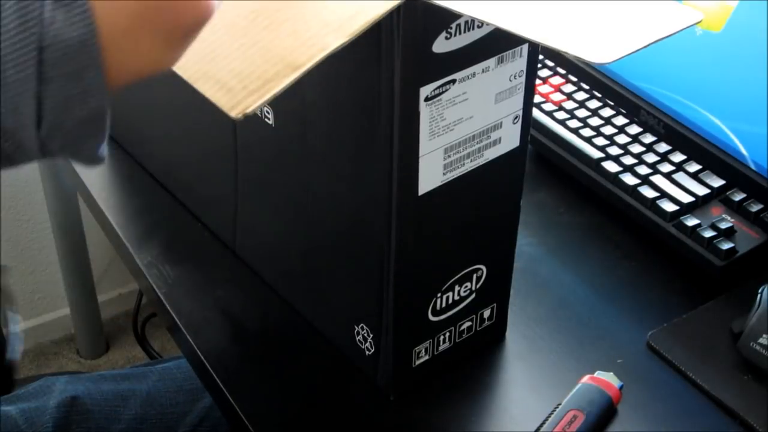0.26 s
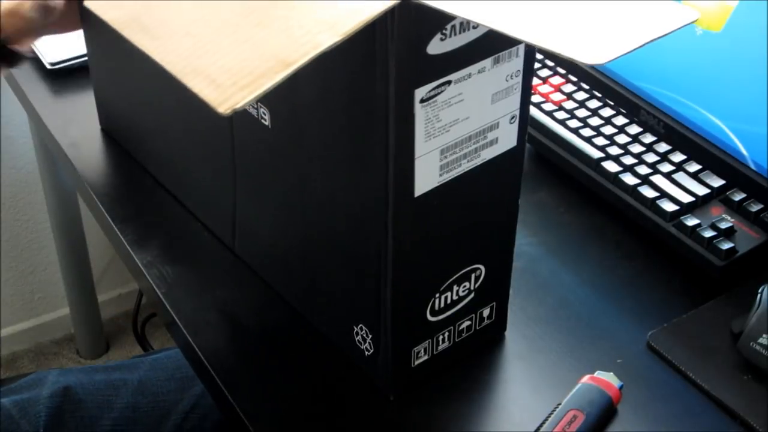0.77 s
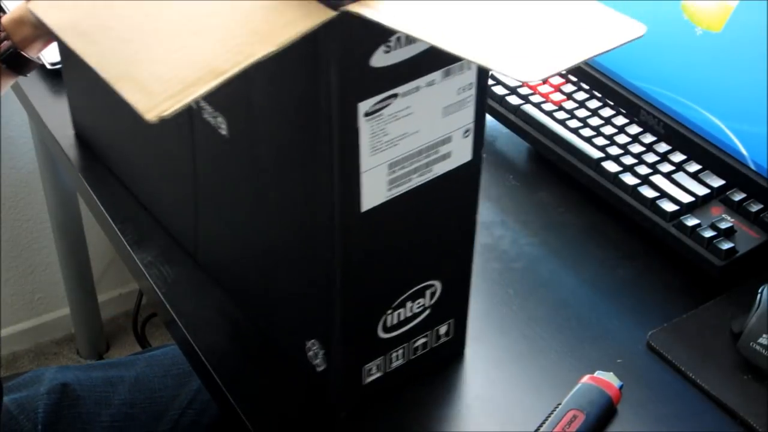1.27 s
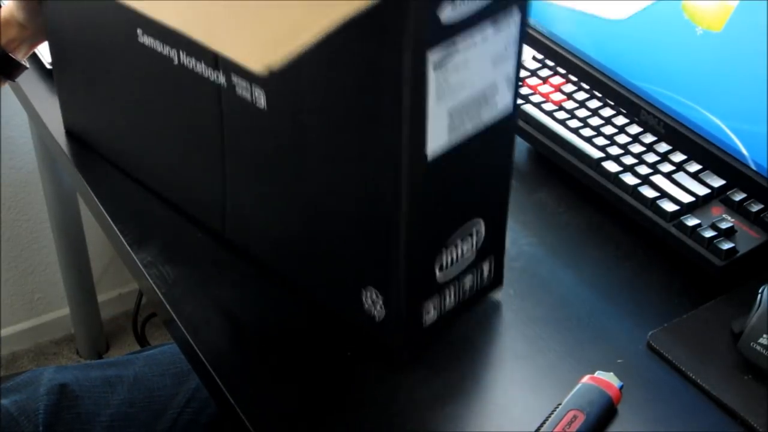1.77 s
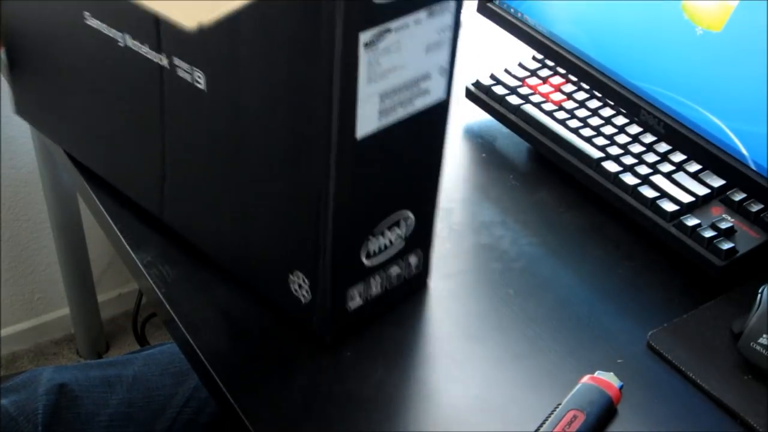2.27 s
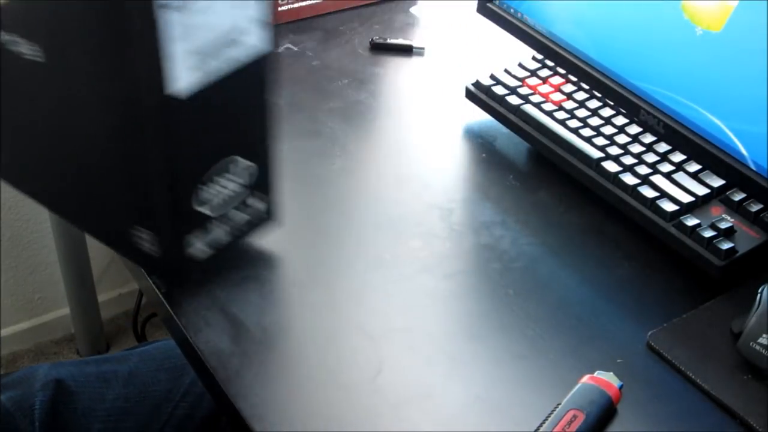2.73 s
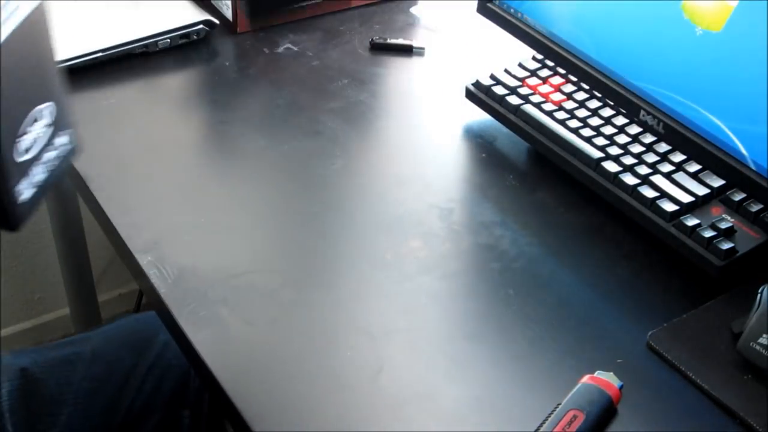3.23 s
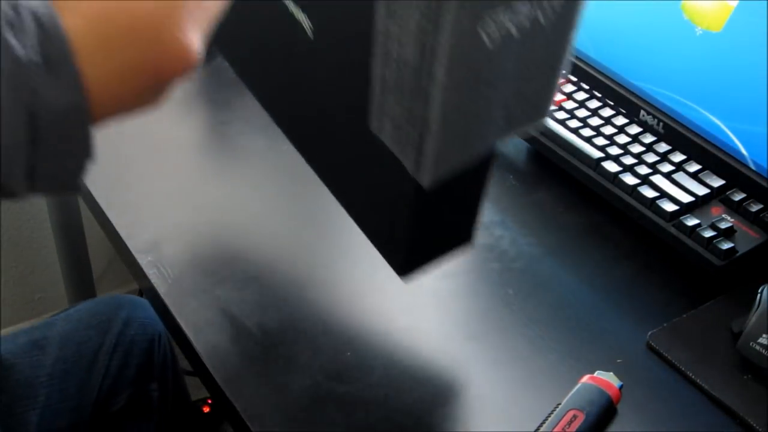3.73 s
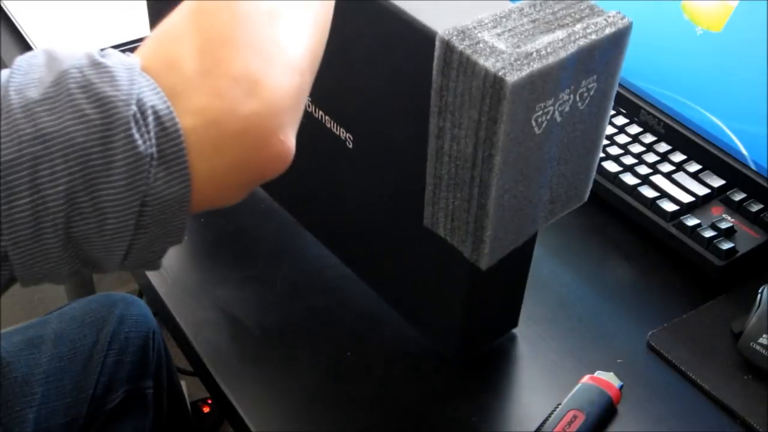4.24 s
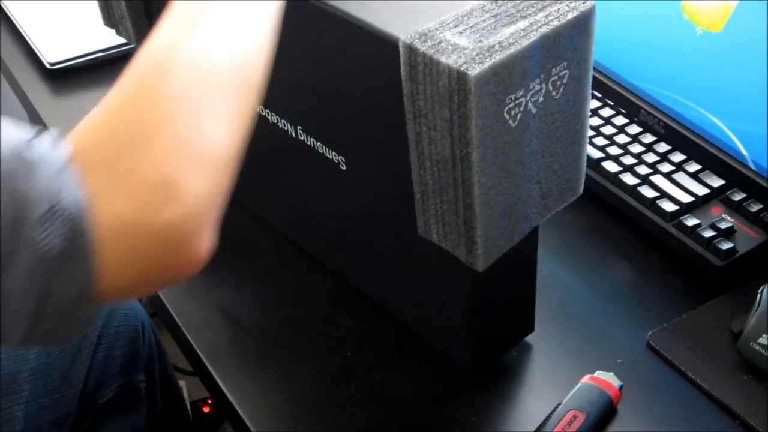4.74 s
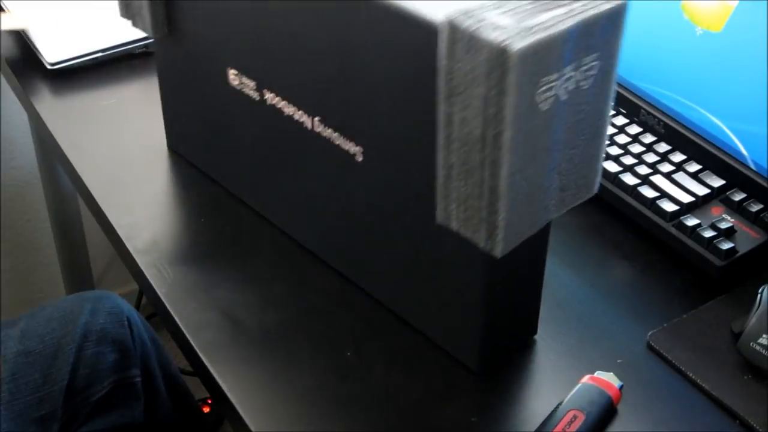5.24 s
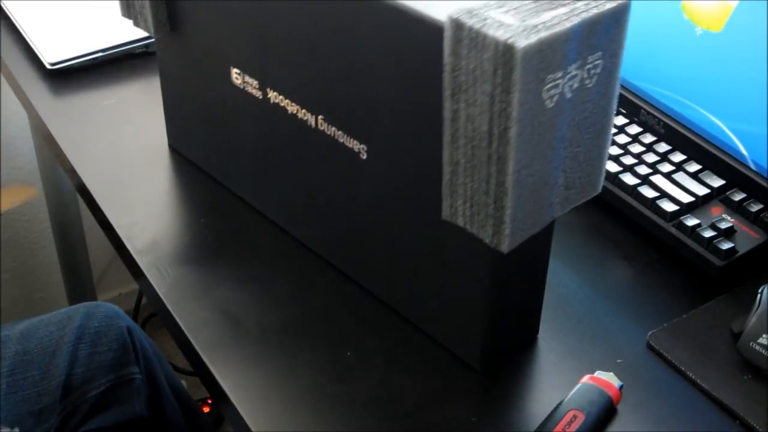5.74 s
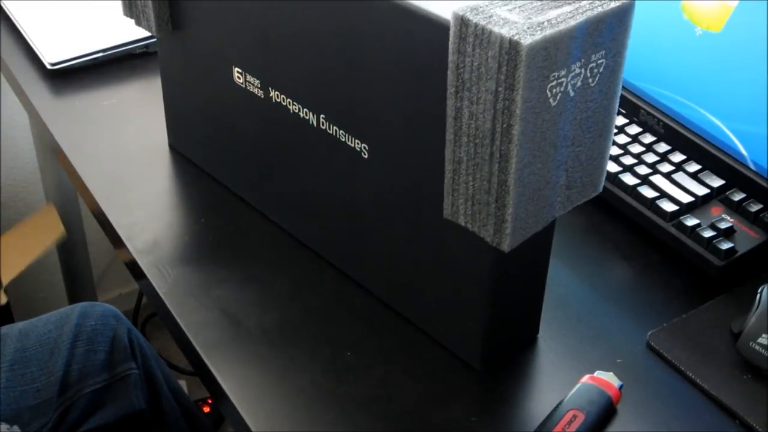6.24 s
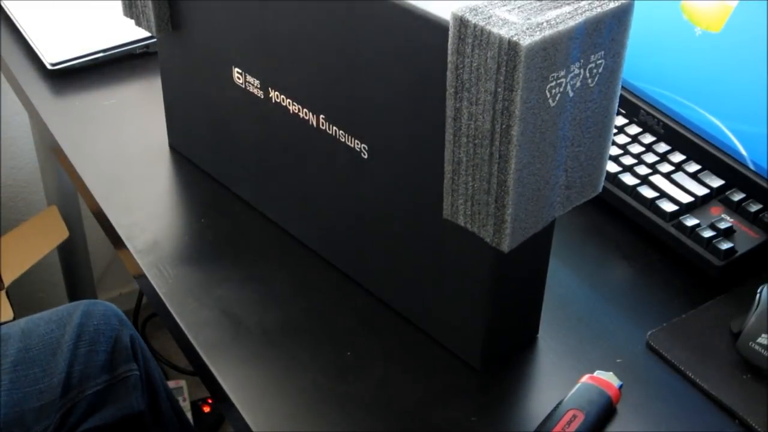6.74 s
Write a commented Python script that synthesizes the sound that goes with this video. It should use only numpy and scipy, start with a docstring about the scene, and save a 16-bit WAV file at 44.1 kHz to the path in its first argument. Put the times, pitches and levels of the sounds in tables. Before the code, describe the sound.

Close handling of a hollow carton: small knocks, papery sliding rasp, a hard bang, a near-quiet gap, a deep desk thump, and more knocks.

```python
"""A cardboard box is gripped, dragged over a desk, lifted away, and its contents set down, close by.
Blows ring the hollow box, the inner pack and the desk top, each a set of fading tones.
Hands and sliding faces rub: many tiny slips make rumble, rasp and hiss. Flaps and edges squeak.
A small room adds a short echo, and steady noise with a quiet hiss lies behind."""
import sys
import numpy as np
from scipy import signal
from scipy.fft import rfft, irfft
from scipy.io import wavfile
from scipy.ndimage import uniform_filter1d

SR = 44100
rng = np.random.default_rng(int(sys.argv[2]) if len(sys.argv) > 2 else 0)


def transcribe(u):
    """Save the signal u as a 16-bit wav file named by the first command-line argument.

    u: samples, shape (n,) or (channels, n), limited to [-1, 1]; the rate is SR.
    q: integer samples, one column per channel.
    """
    v = np.clip(np.atleast_2d(u).T, -1, 1)
    q = np.round(v * 32767).astype(np.int16)
    wavfile.write(sys.argv[1], SR, q)


N = 308692

# short strokes of hands and flaps: start t/s, length t/s, then level/dB of the rumble of the walls,
# the rasp of the edges and the hiss of the sliding faces
STROKES = [(-.03, .14, -57, -41, -51), (0.217, 0.1, -33.5, -39, -56.5), (0.425, 0.083, -47, -49, -55),
           (0.803, .09, -45, -51.5, -54.5), (0.929, 0.2, -45.5, -50, -59),
           (2.169, 0.065, -38.5, -44.5, -58), (2.311, 0.12, -45.5, -48.5, -56.5),
           (2.665, 0.082, -52.5, -65, -66), (2.83, 0.99, -68, -82, -91), (3.215, 0.24, -65, -74, -87),
           (3.46, 0.233, -49.5, -81, -71), (4.14, 0.36, -55, -78, -86), (4.272, 0.082, -64, -57, -68),
           (4.428, 0.47, -58, -55.5, -69), (4.611, 0.13, -45.5, -55, -57), (4.806, 0.39, -47.5, -60, -67.5),
           (5.14, 0.24, -48, -53.5, -65.5), (5.297, 0.082, -51, -52, -59), (5.42, 0.062, -36, -44, -53.5),
           (5.528, 0.12, -32, -42, -64), (5.645, 0.11, -43.5, -45.5, -55.5), (5.791, .1, -53, -50.5, -63),
           (5.94, 0.14, -40, -43.5, -53.5), (6.103, 0.17, -69, -50.5, -51.5),
           (6.19, 0.18, -35.5, -41, -53.5), (6.454, 0.086, -45.5, -43.5, -61.5),
           (6.603, 0.17, -71, -77, -74)]
# share of the length spent swelling; fade after the stroke ends
STROKE_RISE, STROKE_FALL_DB_PER_S = 0.17, 235
# the long drag over the desk: t/s, rumble level/dB, rasp level/dB, hiss level/dB
DRAG_CURVE = [(1.12, -62, -50, -59), (1.2, -41, -31.5, -37), (1.25, -42, -35, -41),
              (1.45, -40.5, -34, -35.5), (1.65, -40.5, -31, -33.5), (1.75, -40.5, -31, -32.5),
              (1.97, -37, -33, -41), (2.066, -48, -29, -34.5), (2.115, -38, -37, -41.5)]
# tone of the rasping edges: f/Hz, level/dB
RASP_COLOUR = [(300, -18), (600, 0), (1000, 6), (1600, 2), (2100, -0.5), (2800, -9), (4000, -23),
               (6000, -50)]
# tone of the sliding hiss: f/Hz, level/dB
HISS_COLOUR = [(1200, -29), (2500, 5.5), (4000, 0.5), (6000, -2), (8000, -8), (10000, -15.5), (16000, -37)]
# tone of the quiet room: f/Hz, level/dB
AIR_COLOUR = [(20, -34), (50, -7.5), (200, 0.5), (500, -6), (1200, -9), (2500, -18), (4000, -25.5),
              (8000, -28.5), (16000, -50.5)]
# how alike the room noise is left and right: f/Hz, likeness (0 to 1)
AIR_LIKENESS = [(60, 0.12), (300, 0.09), (1500, 0.067), (6000, 0.097)]
AIR_DB = -51

# knocks on the outer box: t/s, level/dB, struck panel f/Hz, crack level/dB against the thud,
# rattle time to fall 60 dB t/s
BOX_KNOCKS = [(0.079, -27, 890, -5, 0.095), (0.168, -25, 550, -5, 0.14), (0.227, -29, 278, -6.5, 0.59),
              (0.28, -33, 790, -1, 0.28), (0.325, -23.5, 744, -19, 0.091), (0.44, -35, 650, -16.5, 0.54),
              (0.587, -40, 654, -23, 0.12), (0.638, -37, 308, -16.5, 0.099), (0.681, -37, 299, -16, 0.092),
              (0.751, -25, 157, -30, 0.35), (0.774, -28.5, 180, -25, 1), (0.799, -23.5, 312, -14, 0.13),
              (0.927, -33, 226, -19, 0.1), (2.126, -7.5, 387, -17, 0.25), (2.133, -2, 315, -27, 0.095),
              (2.159, -15.5, 207, -23, 0.71), (2.596, -21, 427, -14, 0.35), (2.728, -42, 600, -16, 0.16),
              (2.875, -46, 700, -10, .12), (3.136, -43, 474, -10, 0.087), (3.258, -29, 353, -31, 0.17),
              (3.282, -29.5, 176, -29, 0.41), (3.32, -22, 180, -28.5, 0.67), (3.457, -30.5, 216, -42, 0.17),
              (3.559, -32.5, 250, -21, 0.056), (3.644, -37, 251, -10, 0.1), (3.679, -39, 301, -39, 0.089),
              (3.785, -32.5, 217, -44, 0.23), (3.873, -42.5, 312, -17, 0.12), (5.019, -35, 263, -17, 0.2),
              (5.105, -25.5, 334, -21.5, 0.42), (5.308, -30, 450, -30.5, 0.15), (5.484, -24, 310, -21, 0.6),
              (5.529, -26, 320, -9.5, 0.072), (5.581, -16, 216, -23, 0.049), (5.607, -26.5, 225, -12, 0.16),
              (5.638, -34, 148, -3.5, 0.066), (5.83, -29.5, 320, -28, 0.22), (5.872, -29.5, 394, -42, 0.21),
              (5.901, -30.5, 339, -24, 0.23), (5.942, -11.5, 224, -24, 0.5), (6.217, -49.5, 900, -1, 0.23),
              (6.264, -15, 173, -15, 0.2), (6.289, -7, 418, -18, 0.46), (6.309, -16, 640, -14, 0.29),
              (6.333, -9.5, 180, -27, 0.26), (6.374, -17, 224, -47, 0.1), (6.885, -58, 200, -26, .12)]
# hollow outer box, one tone per row: f/Hz, level/dB, time to fall 60 dB t/s
BOX_MODES = [(84, -5, 0.082), (153.7, -4, 0.084), (183.3, -7, 0.24), (220.7, -0.5, 0.1),
             (261.4, -0.5, 0.082), (330.4, 6.5, 0.042), (396, 0.5, 0.093), (430, 2, 0.059), (502, 3, 0.069),
             (602, 0.5, 0.071), (650.3, -4.5, 0.13), (777, 6, 0.039), (950, -8, 0.14), (1110, -9, 0.04),
             (1462, -48, 0.063), (1953, -1.5, 0.036)]
# tone of the cracking surface: f/Hz, level/dB
CRACK_COLOUR = [(500, 3.5), (1000, 11), (2000, -4.5), (4000, -14.5), (7000, -20), (10000, -31.5),
                (16000, -51)]
# flaps and edges squeak, creak or snap: t/s, level/dB, pitch f/Hz, width f/Hz, length t/s
SQUEAKS = [(0.079, -32.5, 2000, 700, 0.021), (0.166, -38, 5430, 1500, 0.0045),
           (0.193, -28, 3250, 2860, 0.0038), (0.669, -57, 5800, 1510, 0.0038),
           (1.024, -38, 194, 154, 0.062), (1.177, -36.5, 2530, 700, 0.15), (1.363, -34, 1910, 790, 0.47),
           (1.53, -39.5, 189, 77, 0.14), (1.64, -33, 473, 118, 0.059), (1.698, -30, 1820, 910, 0.33),
           (2.051, -27.5, 420, 120, 0.037), (2.052, -32, 940, 250, 0.062), (2.361, -35.5, 218, 153, 0.1),
           (2.654, -57.5, 5700, 2500, 0.032), (2.725, -49, 786, 590, 0.036), (3.5, -60, 5800, 1500, .005),
           (4.505, -58, 5800, 1500, .005), (5.427, -30.5, 1030, 410, 0.029), (5.487, -50, 1900, 300, 0.057),
           (5.52, -43, 1900, 400, 0.0067), (5.697, -29.5, 880, 497, 0.028), (5.698, -38, 1720, 900, 0.022),
           (6.07, -28, 1030, 199, 0.017), (6.209, -40, 1530, 705, 0.063), (6.466, -45, 1980, 250, 0.064)]
# heavy blows also shake the desk: t/s, level/dB
DESK_THUMPS = [(2.124, -21), (4.242, -31.5), (4.315, -43), (4.592, -20), (5.581, -35), (5.943, -39),
               (6.263, -30)]
# desk top, one tone per row: f/Hz, level/dB, time to fall 60 dB t/s
DESK_MODES = [(44.1, 6, 0.62), (65.6, 16, 0.25), (93, 20, 0.3)]
THUMP_HZ, THUMP_CRACK_DB, THUMP_T60_S = 54, -59, 0.6
# the inner pack lands and bounces on the desk: t/s, level/dB, struck panel f/Hz,
# crack level/dB against the thud, rattle time to fall 60 dB t/s
PACK_LANDINGS = [(4.241, -13.5, 300, -19.5, 0.29), (4.594, -2.5, 251, -23.5, 0.37),
                 (4.671, -16, 155, -38, 0.11), (4.697, -23.5, 163, -41, 0.11)]
# inner pack on the desk top, one tone per row: f/Hz, level/dB, time to fall 60 dB t/s
PACK_MODES = [(91, -16, 0.074), (139, 1, 0.082), (222, -10.5, 0.13), (315, 2, 0.061), (420, -3.5, 0.076),
              (509, 1.5, 0.054), (738, 5, 0.064), (1100, -33, 0.081), (1780, -29, .06)]
BOX_RISE_S, PACK_RISE_S, DESK_RISE_S = 0.0095, 0.026, 0.0042  # how fast the push of a blow swells

# how fast the room echo dies: f/Hz, time to fall 60 dB t/s
ROOM_T60 = [(60, 0.11), (300, 0.32), (1500, 0.23), (6000, 0.17)]
# left minus right: f/Hz, level/dB
PORT_LEVEL = [(60, -2.5), (150, -4), (380, -3.5), (950, -2), (2380, 2), (5980, 5.5), (15000, 6.5)]
# how far left leads right: f/Hz, phase/radians
PORT_LEAD = [(0, 0.6), (1460, 0.56), (5940, 0.74), (14000, 0), (15900, 0)]
# overall treble tone, with a narrow hole near 12 kHz: f/Hz, level/dB
TREBLE_COLOUR = [(10000, -2.5), (11000, -5.5), (11600, -13.5), (12400, -60), (12800, -0.5), (15000, 6.5)]
EDGE_HZ = 15780  # upper band limit


def gain_of(db):
    """Turns dB into a plain multiplier."""
    return 10 ** (np.asarray(db) / 20)


def evened(x):
    """Scales a sound to an average (rms) strength of 1."""
    return x / np.sqrt(np.mean(x ** 2) + 1e-20)


def read(points, hz):
    """Reads a curve between its points, on a log-frequency axis."""
    f, value = np.transpose(points)
    return np.interp(np.log(hz + 1), np.log(f + 1), value)


def coloured(x, points):
    """Makes each frequency of x louder or softer, following a curve in dB."""
    hz = np.fft.rfftfreq(x.shape[-1], 1 / SR)
    return irfft(rfft(x) * gain_of(read(points, hz)), x.shape[-1])


def ring_of(modes):
    """A body answers one sharp blow with fading tones; neighbours start in opposite senses."""
    t = np.arange(SR // 3) / SR
    ring = np.zeros(len(t))
    for k, (hz, db, t60) in enumerate(modes):
        ring += (-1) ** k * gain_of(db - 60 * t / t60) * np.sin(2 * np.pi * hz * t)
    return ring


def slips(per_s, spread_db):
    """Random catches of rough fibre, a few of them large."""
    strength = gain_of(spread_db * np.minimum(rng.exponential(1, N), 4))
    size = strength * rng.standard_normal(N)
    return evened(size * (rng.random(N) < per_s / SR))


def rub_levels():
    """Gains of rumble, rasp and hiss: strokes swell, hold and fade; the drag follows its curve."""
    t = np.arange(N) / SR
    s, *levels = np.transpose(DRAG_CURVE)
    dragging = (t > s[0]) * (t < s[-1])
    power = np.array([gain_of(np.interp(t, s, db)) ** 2 * dragging for db in levels])
    for start, length, *db in STROKES:
        swell = np.clip((t - start) / (STROKE_RISE * length), 0, 1)
        fade = gain_of(-STROKE_FALL_DB_PER_S * np.maximum(t - start - length, 0))
        power += (gain_of(db)[:, None] * swell * fade) ** 2
    return np.sqrt(power)


def rubbing():
    """Sparse slips shake the walls, frequent ones rasp, and the most frequent merge into hiss."""
    rumble, rasp, hiss = rub_levels()
    wall_colour = [(70, -12.5), (150, -3.5), (300, -1.5), (600, -4.0), (1200, -11.5)]
    ring = coloured(ring_of(BOX_MODES), wall_colour)
    ring /= np.linalg.norm(ring)
    walls = signal.oaconvolve(rumble * slips(per_s=250, spread_db=-1.0), ring)[:N]
    # uneven grip makes the slips stronger and weaker in clumps
    grip = gain_of(1.06 * evened(uniform_filter1d(rng.standard_normal(N), size=500)))
    edges = evened(coloured(grip * slips(per_s=6000, spread_db=2.0), RASP_COLOUR))
    faces = evened(coloured(np.sqrt(grip) * slips(per_s=12000, spread_db=2), HISS_COLOUR))
    return walls + rasp * edges + hiss * faces


def air():
    """Steady room noise and hiss, partly shared by both ports."""
    a, b = rfft(rng.standard_normal((2, N)))
    same = np.clip(read(AIR_LIKENESS, np.fft.rfftfreq(N, 1 / SR)), 0, 1)
    pair = irfft(np.array([a, same * a + np.sqrt(1 - same ** 2) * b]), N)
    return gain_of(AIR_DB) * evened(coloured(pair, AIR_COLOUR))


def blows_on(modes, blows, rise):
    """A touch, a swelling push and a dying rattle pass the panel and ring the body; it cracks."""
    out, ring, t = np.zeros(N + SR), ring_of(modes), np.arange(SR // 2) / SR
    for s, db, hz, crack_db, t60 in blows:
        rattle, grit = rng.standard_normal((2, len(t)))
        dying = gain_of(-60 * t / t60)
        push = np.sqrt(t / rise) * np.exp(-t / rise)
        force = rattle * (0.38 * push + 0.31 * dying)
        force[0] += 30  # the first touch
        panel = signal.butter(2, [hz / 2.04, hz * 1.54], "bandpass", fs=SR, output="sos")
        thud = signal.fftconvolve(signal.sosfilt(panel, force), ring)[:len(t)]
        # level the thud by its loudest short stretch
        thud /= 2.36 * np.sqrt(uniform_filter1d(thud ** 2, size=600).max())
        crack_shape = np.minimum(t / 0.003, 1) * (gain_of(-60 * t / 0.028) + 1.27 * dying)
        crack = evened(coloured(grit, CRACK_COLOUR)) * crack_shape
        at = round(s * SR)
        out[at:at + len(t)] += gain_of(db) * (thud + gain_of(crack_db) * crack)
    return out[:N]


def box_knocks():
    """Knocks ring the hollow outer box."""
    return blows_on(BOX_MODES, BOX_KNOCKS, BOX_RISE_S)


def squeaks():
    """Random chatter passes one narrow band and dies away quickly."""
    out, t = np.zeros(N + SR), np.arange(SR // 4) / SR
    for s, db, hz, width, length in SQUEAKS:
        edges = [hz - width / 2, hz + width / 2]
        band = signal.butter(2, edges, "bandpass", fs=SR, output="sos")
        tone = evened(signal.sosfilt(band, rng.standard_normal(len(t))))
        shape = np.minimum(t / (0.053 * length), 1) * np.exp(-(t / length) ** 2)
        at = round(s * SR)
        out[at:at + len(t)] += gain_of(db) * tone * shape
    return out[:N]


def desk_thumps():
    """Heavy blows ring the low tones of the desk top."""
    blows = [(s, db, THUMP_HZ, THUMP_CRACK_DB, THUMP_T60_S) for s, db in DESK_THUMPS]
    return blows_on(DESK_MODES, blows, DESK_RISE_S)


def pack_landings():
    """The inner pack rings as it lands and bounces on the desk."""
    return blows_on(PACK_MODES, PACK_LANDINGS, PACK_RISE_S)


def room(x):
    """Sparse echoes of random sign, each band dying at its own speed, different at each port."""
    taps = np.zeros((2, SR // 2))
    at = np.arange(200, SR // 2 - 20, 20) + rng.integers(0, 20, (2, (SR // 2 - 201) // 20))
    np.put_along_axis(taps, at, rng.choice([-1., 1.], at.shape), 1)
    hz, t, bands = signal.stft(taps, SR, nperseg=256)
    dying = gain_of(-60 * t / read(ROOM_T60, hz)[:, None])
    tail = signal.istft(bands * dying, SR, nperseg=256)[1]
    return signal.fftconvolve(x[None], tail / np.linalg.norm(tail[0]), axes=1)[:, :N]


def ports(x):
    """Two close microphone ports hear the sound with a small tilt in level and phase."""
    hz = np.fft.rfftfreq(x.shape[-1], 1 / SR)
    # each port takes half of the difference
    tilt = gain_of(read(PORT_LEVEL, hz) / 2) * np.exp(.5j * read(PORT_LEAD, hz))
    return irfft(rfft(x) * np.array([tilt, 1 / tilt]), x.shape[-1])


def scene():
    """Box, pack and desk sounds, their echoes at both ports, and the quiet room."""
    close = rubbing() + box_knocks() + squeaks() + desk_thumps() + pack_landings()
    echo = room(close)
    # the echo is mostly alike at both ports, least so in the treble
    side_colour = [(100, -33), (1000, -10), (4000, -4.5), (12000, 1)]
    side = coloured(echo[0] - echo[1], side_colour)
    echo = echo.mean(0) + side * np.array([[1], [-1]])
    return ports(close + gain_of(-7.5) * echo) + air()


def record(dry):
    """Treble tone, then the upper band limit."""
    low_pass = signal.firwin(511, EDGE_HZ, window=("kaiser", 9), fs=SR)
    return signal.oaconvolve(coloured(dry, TREBLE_COLOUR), low_pass[None], "same")


dry = scene()
out = record(dry)
transcribe(out)
```